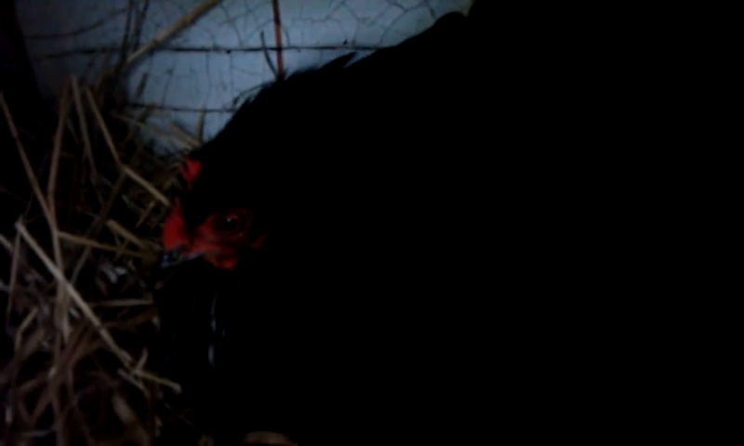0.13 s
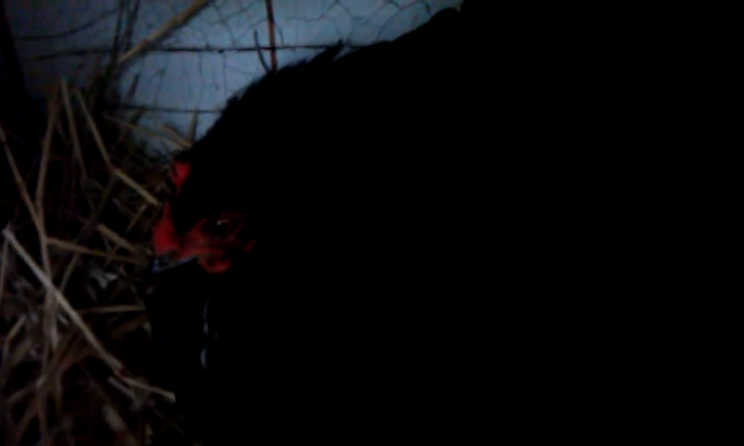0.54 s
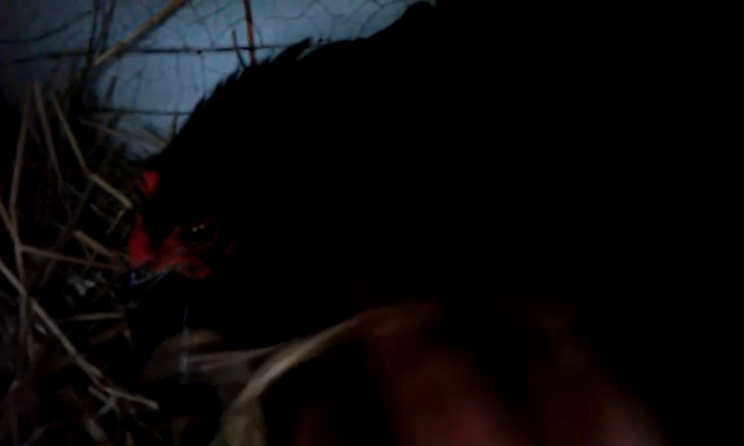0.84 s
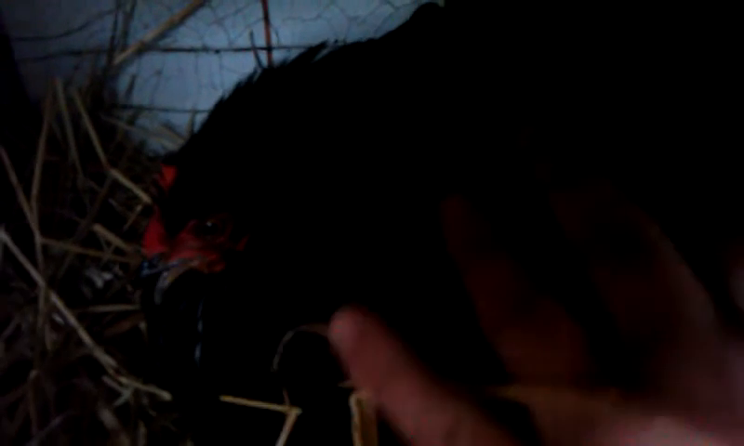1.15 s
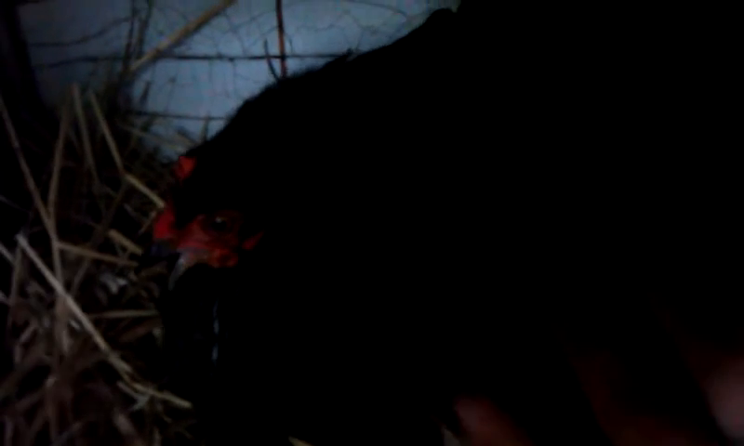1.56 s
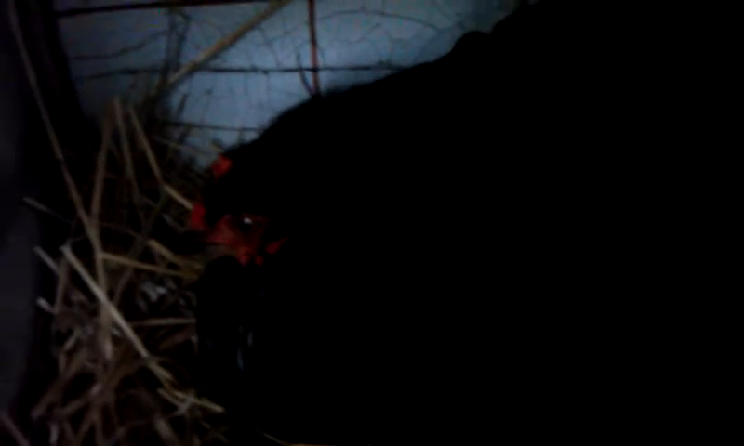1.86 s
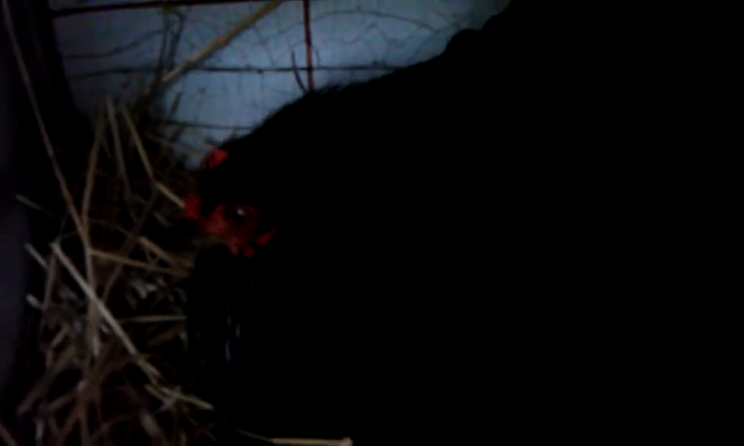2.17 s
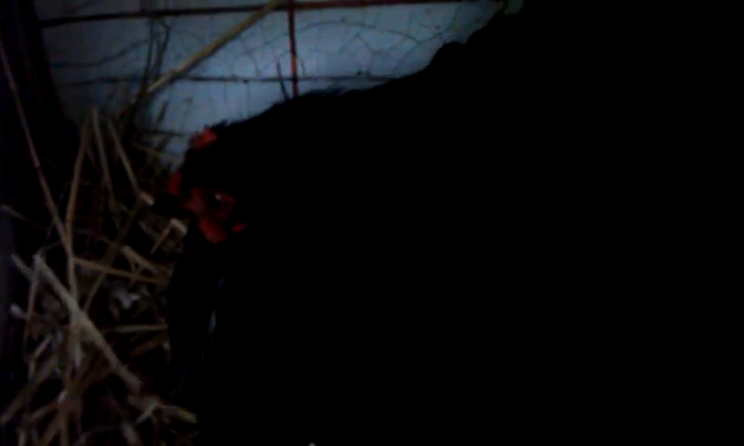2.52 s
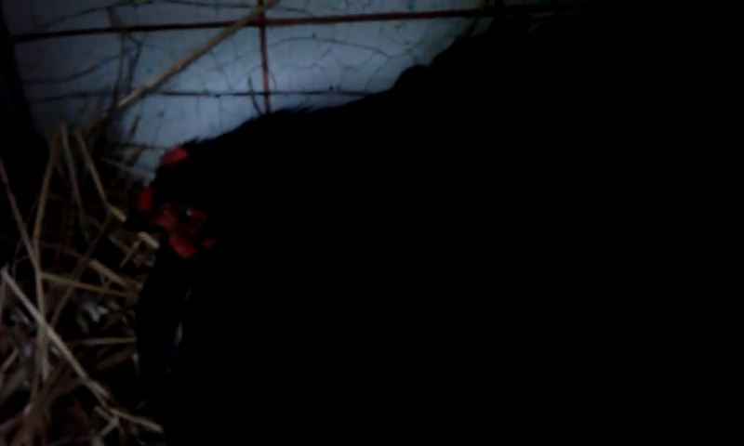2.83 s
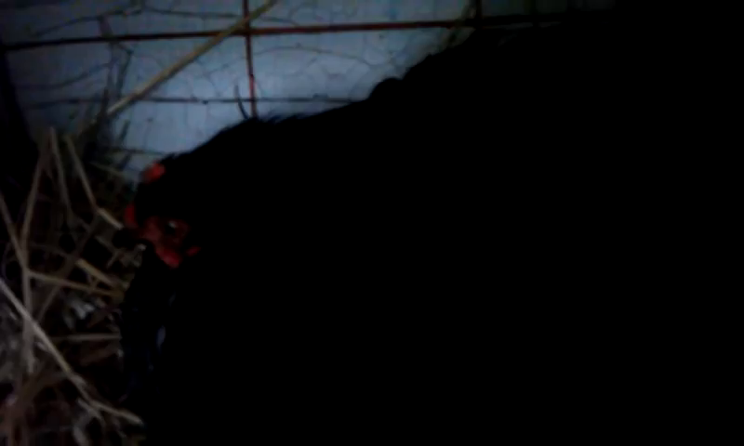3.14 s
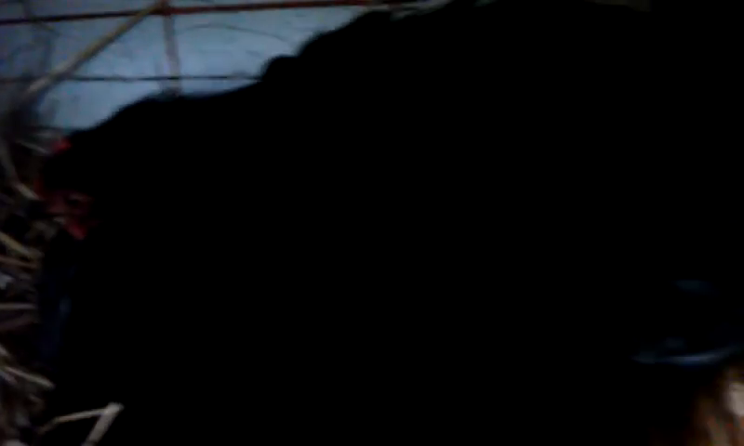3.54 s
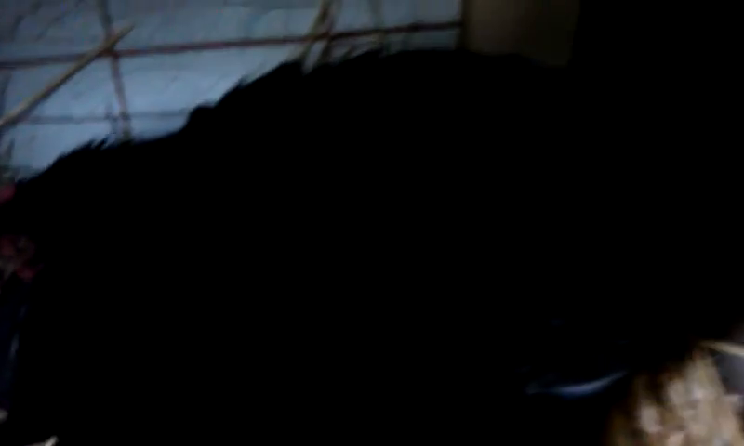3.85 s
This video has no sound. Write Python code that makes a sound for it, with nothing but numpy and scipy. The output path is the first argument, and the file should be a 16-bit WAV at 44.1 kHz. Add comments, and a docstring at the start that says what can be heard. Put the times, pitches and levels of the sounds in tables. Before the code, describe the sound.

A broody hen growls harshly at close range until about 0.35 s as straw rustles lightly. From 0.6 to 2.15 s she draws out a rough, rapidly fluttering squawk, a straw snapping near 0.87 s, wet throat spits around 1.2-1.4 s, pitch sagging at the end. One short soft cluck comes at 2.55 s, then faint rustles and a distant coo near 3.7 s, over outdoor hiss and low hum.

```python
"""Over a steady hum and a broad outdoor hiss, a broody hen in a straw nest growls while straw rustles.
From 0.6 s she draws the growl out into a squawk: a straw snaps early on and her throat spits midway.
Her syrinx pulses mostly near 700 Hz, a 49 Hz flutter swings pitch and level, and the throat resonates.
The background sinks under the squawk and recovers after it; one soft cluck, two faint rustles and
a far coo end the scene."""
import sys
import numpy as np
from scipy import signal
from scipy.io import wavfile
from scipy.ndimage import uniform_filter1d

SR = 44100
rng = np.random.default_rng(int(sys.argv[2]) if len(sys.argv) > 2 else 0)


def to_linear_factor(level_db):
    """Convert decibel levels (scalar or array-like) to linear amplitude factors."""
    exponent = np.asarray(level_db, float) / 20
    return 10 ** exponent


def int16_out(signal):
    """Quantize to a 16-bit WAV file."""
    q = np.round(np.clip(np.atleast_2d(signal).T, -1, 1) * 32767)
    wavfile.write(sys.argv[1], SR, q.astype(np.int16))


N = 176400


def rms_one(x):
    """Scale to rms 1."""
    return x / np.sqrt(np.mean(x ** 2) + 1e-20)


def in_time(rows):
    """Join each column by straight lines, one value a sample."""
    time_s, *columns = np.transpose(rows)
    return [np.interp(np.arange(N) / SR, time_s, column) for column in columns]


def drift(rate_hz):
    """Random wander of rms 1: noise through two equal one-pole low-passes."""
    r = np.exp(-2 * np.pi * rate_hz / SR)
    noise = rng.standard_normal(N + SR)
    return rms_one(signal.lfilter([1], [1, -2 * r, r * r], noise)[SR:])


def bump(centre_s, length_s):
    """Gaussian swell, standard deviation a quarter of its length."""
    return np.exp(-.5 * ((np.arange(N) / SR - centre_s) / (length_s / 4)) ** 2)


def resonance(x, hz, width_hz, state=None):
    """Two-pole resonance, gain 1 on top."""
    r = np.exp(-np.pi * width_hz / SR)
    b = np.array([1, 0, -1]) * (1 - r * r) / 2
    a = [1, -2 * r * np.cos(2 * np.pi * hz / SR), r * r]
    return signal.lfilter(b, a, x) if state is None else signal.lfilter(b, a, x, zi=state)


def gliding(x, hz, width_hz):
    """Resonance whose centre and width move, stepped every 256 samples."""
    out, state = np.zeros(N), np.zeros(2)
    for i in range(0, N, 256):
        out[i:i + 256], state = resonance(x[i:i + 256], hz[i], width_hz[i], state)
    return out


def bank(x, rows):
    """Parallel resonances with alternating signs."""
    return sum((-1) ** k * to_linear_factor(db) * resonance(x, hz, width_hz)
               for k, (hz, width_hz, db) in enumerate(rows))


def butter(x, order, hz, kind):
    """Butterworth filter."""
    return signal.sosfilt(signal.butter(order, hz, kind, fs=SR, output="sos"), x)


# hiss spectrum, relative: freq_hz, density_db (per Hz)
AIR_SPECTRUM = [(60, -26), (130, -7), (231, -14.5), (521, -8.5), (773, -3), (1520, -0.5), (2700, -7.5),
                (3420, -11), (4630, -25), (11500, -29.5), (15500, -19.5)]
# background level, sinking during the squawk, back up within half a second of its end: time_s, level_db
AIR_LEVEL_TRACK = [(0, -45), (.6, -45.5), (2.2, -54), (2.4, -47.5), (2.7, -45), (3.5, -46), (4, -45)]
# hum tones: freq_hz, peak_db (over background level)
HUM_TONES = [(142.8, -15), (92, -23)]


def air(patchy_db):
    """Third-octave noise bands, each flickering in level, plus hum tones wavering in pitch and level."""
    out = 0
    edges_hz = 45 * 2 ** np.arange(0, 8.6, 1 / 3)
    white = rng.standard_normal((2, N))  # neighbouring bands use separate noises
    freq_hz, density_db = np.transpose(AIR_SPECTRUM)
    for k, (low, high) in enumerate(zip(edges_hz, edges_hz[1:])):
        band = butter(white[k % 2], 2, [low, high], "band")
        band_db = np.interp(np.log(low * high) / 2, np.log(freq_hz), density_db)
        out = out + band * to_linear_factor(band_db + patchy_db * drift(15.8))
    hum = 0
    for hz, db in HUM_TONES:
        cycles = np.cumsum(hz + 0.5 * drift(4.5)) / SR
        hum = hum + to_linear_factor(db + 0.58 * drift(11)) * np.sin(2 * np.pi * cycles)
    return to_linear_factor(in_time(AIR_LEVEL_TRACK)[0]) * (rms_one(out) + hum)


# far coos: centre_s, half_length_s, peak_db, pitch_hz
FAR_COOS = [(3.73, 0.026, -45, 646)]


def coos():
    """Soft far-off sine tones under Gaussian swells."""
    t = np.arange(N) / SR
    return sum(to_linear_factor(db) * bump(s, half_s * 2) * np.sin(2 * np.pi * hz * t)
               for s, half_s, db, hz in FAR_COOS)


# straw rubbing: centre_s, length_s, level_db (rms at the top), centre_hz
STRAW_RUSTLES = [(0.138, 0.02, -50, 13300), (0.321, 0.039, -40.5, 13100), (0.747, 0.09, -48.5, 12720),
                 (0.871, 0.035, -41, 11230), (2.869, 0.77, -58, 9700), (3.787, 0.74, -56.5, 11600)]
# single straws snapping: time_s, impulse_db (before the resonances)
STRAW_SNAPS = [(.867, -20)]
CRACKLES_PER_S, CRACKLE_SPREAD_DB = 9900, 3


def straw():
    """Rustles are dense random impulses in a treble resonance; a snap is one impulse ringing two."""
    struck = rng.random(N) < CRACKLES_PER_S / SR
    size = to_linear_factor(CRACKLE_SPREAD_DB * rng.exponential(1, N))
    grains = struck * size * rng.choice([-1, 1], N)
    rustles = 0
    for s, length_s, db, hz in STRAW_RUSTLES:
        crackle = resonance(resonance(grains, hz, 4000), hz, 4000)
        rustles = rustles + to_linear_factor(db) * bump(s, length_s) * rms_one(crackle)
    snaps = np.full(N, 1e-18)
    for s, db in STRAW_SNAPS:
        snaps[int(s * SR)] = to_linear_factor(db)
    return rustles + resonance(snaps, 8000, 1523) * 4 + resonance(snaps, 13000, 4030) * 2


# wet spits in the throat: time_s, drive_db (before noise and resonances)
THROAT_SPITS = [(1.1742, -30.5), (1.2179, -30.5), (1.2334, -26), (1.258, -34), (1.275, -32.5), (1.314, -27),
                (1.328, -32.5), (1.3552, -30), (1.3725, -27.5), (1.387, -31)]
# spit resonances: freq_hz, width_hz, gain_db
SPIT_RESONANCES = [(4470, 183, 19.5), (7800, 1670, 2)]


def spits():
    """Each spit is a noise burst, longer when stronger, in two treble resonances."""
    bursts = sum(to_linear_factor(db) * bump(s + 0.00067, 0.039 * np.sqrt(to_linear_factor(db))) for s, db in THROAT_SPITS)
    return bank(bursts * rng.standard_normal(N) * .5 + 1e-18, SPIT_RESONANCES)


# flutter ahead of (+) or behind (-) a steady beat: time_s, lead_beats
FLUTTER_LEADS = [(0, -0.53), (.17, -0.55), (.3, -0.41), (.62, 0.2), (.664, 0.12), (.88, -0.36),
                 (.96, -0.0015), (1.1, -0.138), (1.26, 0.26), (1.42, 0.31), (1.66, .54), (1.82, 0.62),
                 (1.9, 0.85), (2.06, 0.22), (2.15, -0.22)]
FLUTTER_HZ = 49


def flutter_beats():
    """Running beat count: a steady rate plus the lead."""
    return FLUTTER_HZ * np.arange(N) / SR + in_time(FLUTTER_LEADS)[0]


# syrinx: time_s, pitch_hz, flutter_swing_hz, flutter_swing_db, every_second_beat_swing_db,
# roughness (0-1), strong_weak_pulses (0-1)
SYRINX_TRACK = [(0, 676.1, 120, -11.5, 3.5, 0.4, 0), (.17, 700.7, 147, -3.5, 2.5, 0.09, 0.42),
                (.24, 662, 62, -5.5, -1.5, 0.27, 0.1), (.31, 589.8, 59.5, -5.5, 1, 0.44, 0.75),
                (.575, 281.2, -3.5, -6, 15.5, 0.26, 0), (.6, 691, 60, -13, 0, 0.37, 0.01),
                (.8, 672.6, 31.5, 2.5, 6, 0.37, 0.99), (.89, 694, 52, -6.5, 1, 0.34, 0.56),
                (.95, 739.7, 106, -4.5, 3.5, 0.09, 0.21), (1.12, 721, 67, -2.5, 3.5, .09, 0.03),
                (1.4, 707.5, 86.5, -0.5, 2, 0.2, 0), (1.55, 692, 129, 1, 1.5, 0.14, 0.14),
                (1.78, 715.4, 93.5, 1, 1.5, 0.11, 0.14), (1.92, 610.4, 107, 2, 1, .05, 0.27),
                (2.0, 500, 60, -4.5, -1.5, 0.08, 0.23), (2.09, 294.3, 23, 2, 1, 0.24, 0.17),
                (2.15, 246.8, 12.5, 1.5, 1.5, 0.17, 0.03), (2.55, 285, -10, 0, 5, 0.2, 0.13)]
# in each beat the pitch leaps up, sags along a plateau and dips briefly
PLATEAU, SAG = 0.15, 0.21
JITTER, SHIMMER, BREATH = 0.27, 0.7, 0.2 * to_linear_factor(1.5)  # at roughness 1
FLUTTER_SQUARENESS, UNEVEN_DB = 2.0, 1.0


def syrinx(beats):
    """Fluttering, jittered pulses and puffs of breath; also returns pitch and two level swings."""
    pitch_hz, swing_hz, beat_db, pair_db, rough, strong_weak = in_time(SYRINX_TRACK)
    flutter = np.cos(2 * np.pi * beats)
    pairs = np.cos(np.pi * (beats - .5))
    sweep = flutter - PLATEAU * np.cos(4 * np.pi * beats) - SAG * np.sin(4 * np.pi * beats)
    hz = pitch_hz + swing_hz * sweep * (1 + .12 * drift(33.9))
    hz = hz * (1 + JITTER * rough * drift(250.3))
    cycles = np.cumsum(np.clip(hz, 100, 1500)) / SR
    count = cycles.astype(int)

    at = np.flatnonzero(np.diff(count)) + 1
    shimmer = SHIMMER * rough[at] * np.diff(rng.standard_normal(N))[count[at]]
    alternation = strong_weak[at] * np.maximum(pairs[at], 0) * (-1.) ** count[at]
    size = (1 + shimmer) * (1 + alternation)

    puffs = 1 + np.cos(2 * np.pi * cycles)
    source = BREATH * rough * rng.standard_normal(N) * puffs
    # each pulse is shared between two samples to keep its exact time
    late = (cycles[at] - count[at]) / (cycles[at] - cycles[at - 1])
    source[at] -= size * (1 - late)
    source[at - 1] -= size * late

    flutter_db = beat_db * np.tanh(FLUTTER_SQUARENESS * flutter)
    uneven_db = pair_db * pairs + UNEVEN_DB * drift(47)
    return source, pitch_hz, flutter_db, uneven_db


# throat and beak: time_s, main_hz, chest_db, low_db, treble_db
THROAT_TRACK = [(0, 1454, -16, -1, -16.5), (.3, 1350, -14.5, 2, -4.5), (.575, 1330, 10, 1, 2),
                (.6, 1403, -14.5, 0, -39), (.9, 1431, -15.5, -4.5, -33), (1.0, 1454, -66, -9, -24),
                (1.15, 1375, -20.5, -10.5, -8.5), (1.3, 1440, -23.5, -16, -5), (1.47, 1452, -37.5, -19, -9),
                (1.75, 1535, -39.5, -19.5, -7.5), (1.92, 1489, -34.5, -13, -16), (2.05, 1473, -11, -9, -19),
                (2.15, 1484, -9, -10.5, -26), (2.55, 1183, 2.5, -2, -14)]
# low resonances: freq_hz, width_hz, gain_db
LOW_RESONANCES = [(403, 81, -7.5), (593, 227, -6.5), (1106, 74, -3.5)]
# treble resonances: freq_hz, width_hz, gain_db
TREBLE_RESONANCES = [(3850, 250, -23.5), (6800, 1500, -35)]
# steep fixed resonance: time_s, gain_db
THIRD_TRACK = [(.3, -37), (1.0, -20), (1.55, -25), (1.7, -38), (2.1, -43)]
THIRD_HZ, THIRD_WIDTH_HZ = 2750, 280
CHEST_HZ, CHEST_WIDTH_HZ = 267, 85
# taut widths; below TAUT_HZ pitch the throat slackens and these two widen in proportion
TAUT_HZ, MAIN_WIDTH_HZ, SECOND_WIDTH_HZ = 680, 135, 334
SECOND_RATIO, SECOND_DB = 1.414, -11.5  # the second resonance moves with the main one
LOW_FOLLOWS = 0.3  # share of the flutter's dB swing in chest and low resonances
TREBLE_SPIT_DB, BEAK_CUT_HZ = 3, 2600  # treble flicker; cut of the lower resonances


def throat(source, pitch_hz, flutter_db):
    """Moving and fixed resonances of windpipe, chest and beak ring to the source in parallel."""
    main_hz, chest_db, low_db, treble_db = in_time(THROAT_TRACK)
    slack = np.maximum(TAUT_HZ / pitch_hz, 1)
    main = gliding(source, main_hz, MAIN_WIDTH_HZ * slack)
    second_hz = SECOND_RATIO * main_hz
    second = gliding(source, second_hz, 2 * SECOND_WIDTH_HZ * slack)
    second = gliding(second, second_hz, SECOND_WIDTH_HZ * slack)
    windpipe = main - to_linear_factor(SECOND_DB) * second

    chest = to_linear_factor(chest_db) * resonance(source, CHEST_HZ, CHEST_WIDTH_HZ)
    low = to_linear_factor(low_db) * bank(source, LOW_RESONANCES)
    voice = windpipe * to_linear_factor(flutter_db) + to_linear_factor(LOW_FOLLOWS * flutter_db) * (chest + low)
    voice = butter(voice, 6, BEAK_CUT_HZ, "low")

    third = resonance(resonance(source, THIRD_HZ, THIRD_WIDTH_HZ), THIRD_HZ, THIRD_WIDTH_HZ)
    voice = voice + to_linear_factor(flutter_db + in_time(THIRD_TRACK)[0]) * third
    treble = butter(bank(source, TREBLE_RESONANCES), 2, [3500, 8500], "band")
    voice = voice + to_linear_factor(treble_db + flutter_db + TREBLE_SPIT_DB * drift(50)) * treble
    return butter(voice, 4, 190, "high")


# loudness, one list a call: time_s, level_db
CALL_EFFORT = [
    [(0, -20.5), (.1, -23.5), (.24, -20), (.283, -20.5), (.29, -32.5), (.297, -17.5), (.312, -28),
     (.34, -38.5), (.37, -90)],
    [(.56, -102), (.58, -39), (.62, -24), (.66, -23.5), (.83, -18.5), (.9, -16.5), (.94, -22.5),
     (1.1, -19.5), (1.3, -20), (1.6, -19.5), (1.8, -20), (1.92, -21), (2.03, -24.5), (2.147, -24),
     (2.153, -30.5), (2.18, -70)],
    [(2.543, -93), (2.551, -33), (2.564, -16), (2.57, -40), (2.59, -84)],
]
# nest echoes: delay_s, level_db
ECHOES = [(.009, -17.5)]


def hen():
    """The syrinx rings the throat; the voice is levelled, shaped into calls and echoed by the nest."""
    source, pitch_hz, flutter_db, uneven_db = syrinx(flutter_beats())
    voice = throat(source, pitch_hz, flutter_db) * to_linear_factor(uneven_db)
    voice = voice / np.sqrt(uniform_filter1d(voice ** 2, size=3600) + 1e-12)  # 82 ms running rms
    voice = voice * to_linear_factor(in_time([row for call in CALL_EFFORT for row in call])[0])
    out = voice
    for k, (delay_s, db) in enumerate(ECHOES):
        delayed = np.r_[np.zeros(int(delay_s * SR)), voice][:N]
        out = out + to_linear_factor(db) * delayed * (-1) ** k
    return out


def scene():
    """All sources, one channel."""
    return (air(patchy_db=1.2) + coos() + straw() + spits() + hen())[None]


def roll_off(x):
    """The treble ends steeply here."""
    return signal.sosfilt(signal.butter(12, 15750, fs=SR, output="sos"), x)


MIC_TOP, MIC_LOW_HZ = 0.53, 49.7  # height towards which peaks round off; bass cut


def record(dry):
    """The microphone rounds peaks and cuts the deep bass."""
    rounded = MIC_TOP * np.tanh(dry / MIC_TOP)
    mix = butter(rounded, 1, MIC_LOW_HZ, "high")
    return roll_off(mix)


dry = scene()
out = record(dry)
int16_out(out)
```